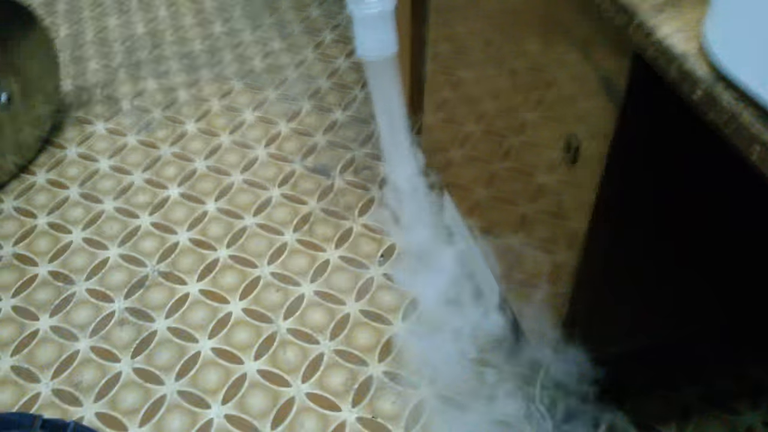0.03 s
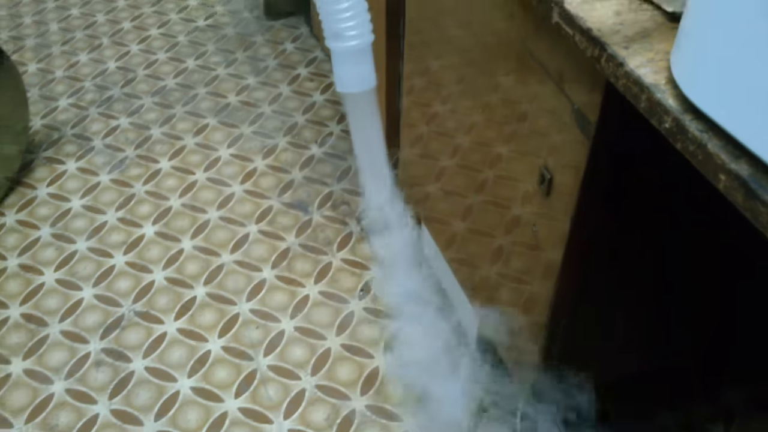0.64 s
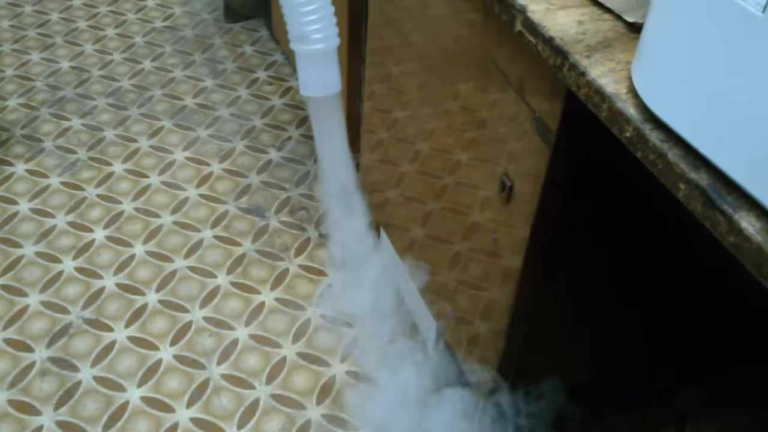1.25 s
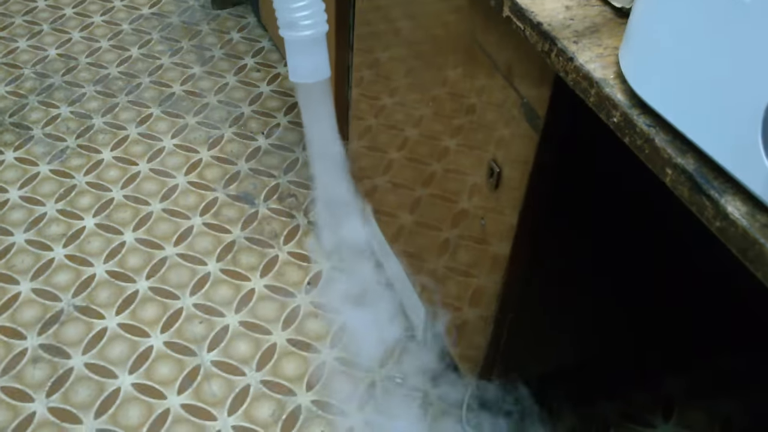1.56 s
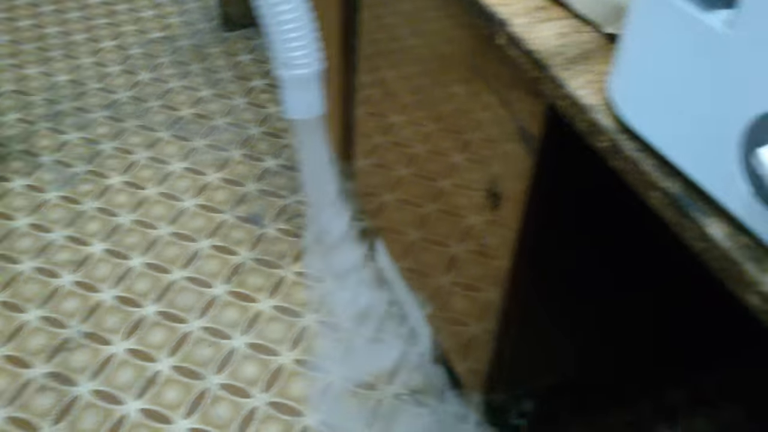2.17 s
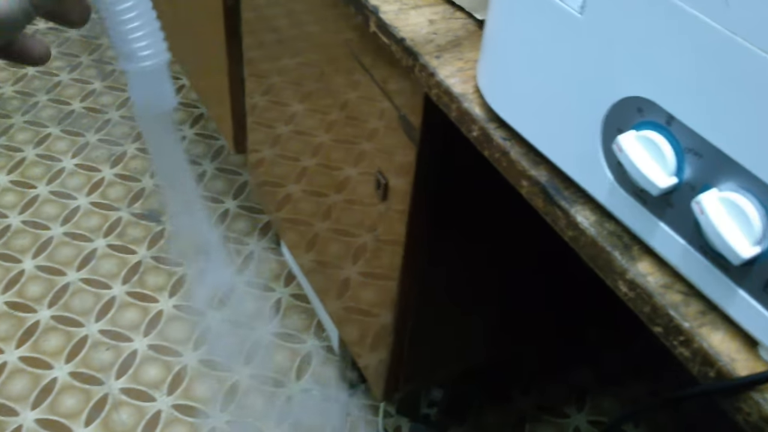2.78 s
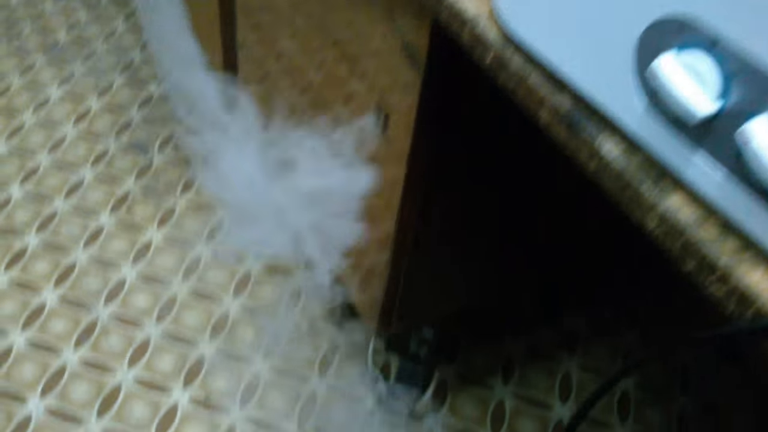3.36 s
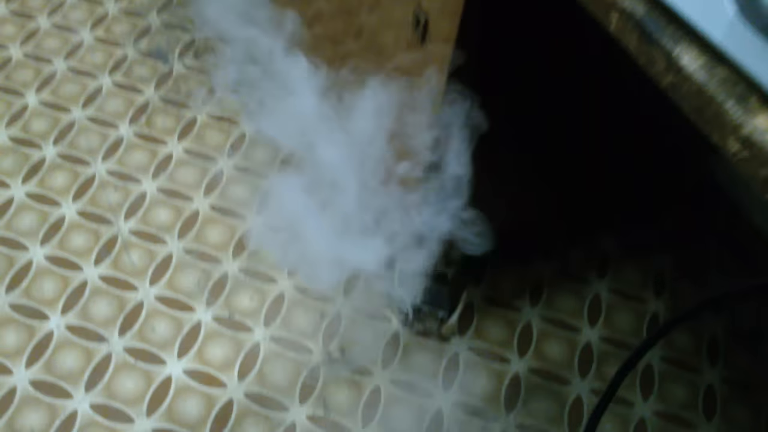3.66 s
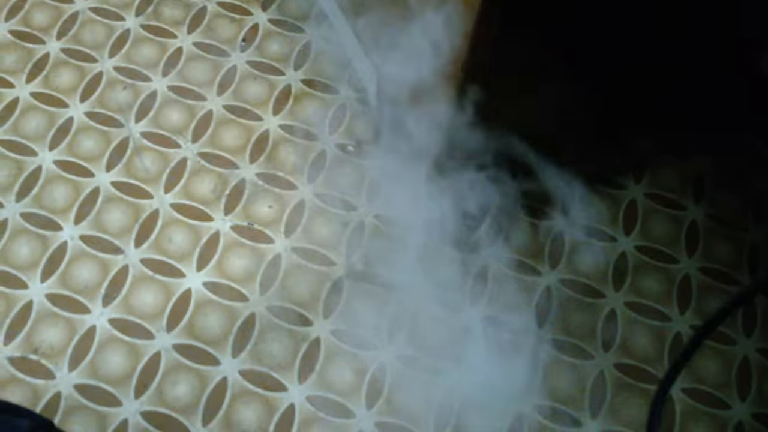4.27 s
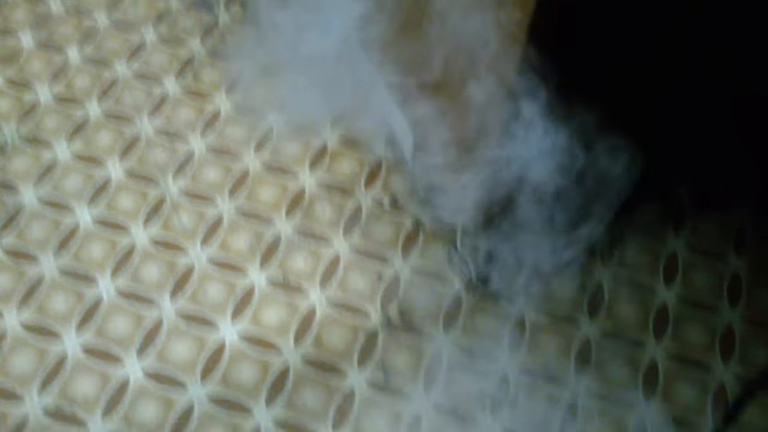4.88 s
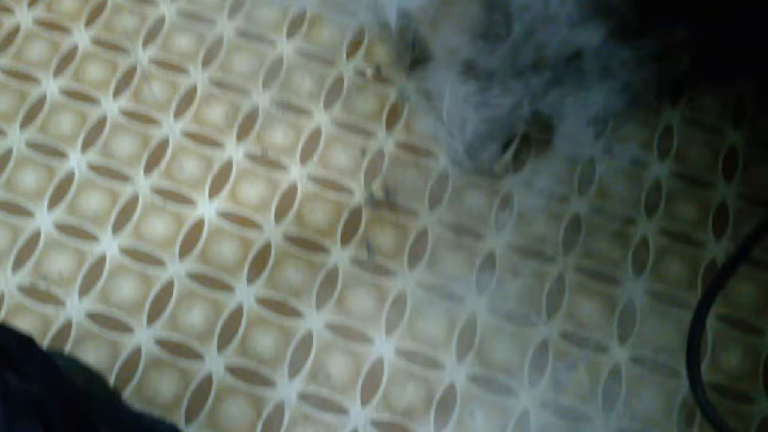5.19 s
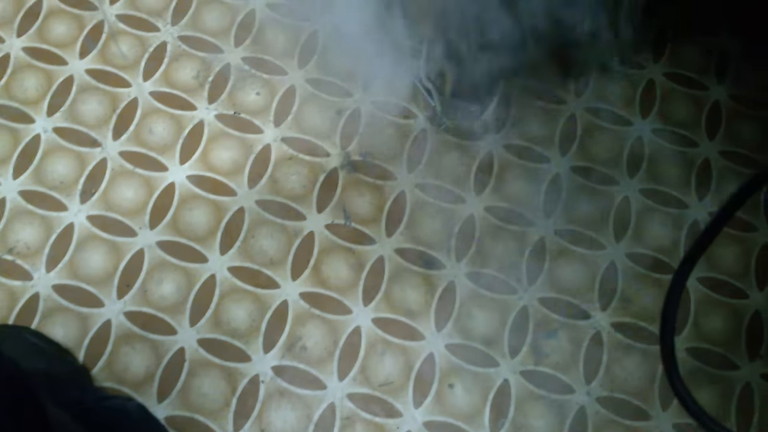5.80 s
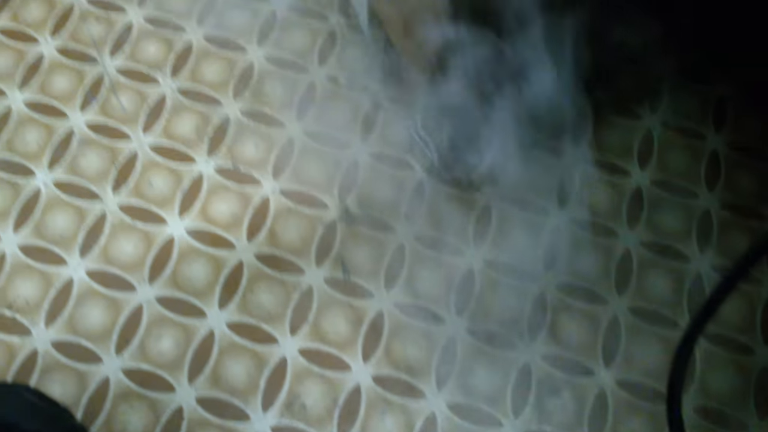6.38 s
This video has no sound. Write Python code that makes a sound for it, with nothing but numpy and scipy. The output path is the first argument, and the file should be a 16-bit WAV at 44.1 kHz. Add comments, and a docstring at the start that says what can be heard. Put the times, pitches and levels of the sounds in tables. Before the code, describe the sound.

In a small room, a hand-held microphone switches on with a pop beside a running mist machine. A low motor hum, a fan whine and a soft rush of air continue throughout, with a thin hiss building at the hose mouth. Underneath are a faint, rapid rattle, scattered high droplet ticks and a few soft handling bumps. Halfway through, the microphone moves lower, gently changing the colour of the whine.

```python
"""A small pop as the microphone switches on, then an ultrasonic inhaler running close by in a small room.
Its blower whines over a deep motor hum and drives mist through a hose; air rushes, and hisses at the mouth.
A loose part rattles faintly, droplets tick in the mist cup, and fingers knock and rustle on plastic.
The hand-held microphone starts beside the case, sinks to the floor, then turns towards the mist."""
import sys
import numpy as np
from scipy import signal
from scipy.fft import rfft, irfft
from scipy.io import wavfile
from scipy.ndimage import uniform_filter1d

SR = 44100
rng = np.random.default_rng(int(sys.argv[2]) if len(sys.argv) > 2 else 0)


def persist_wave(psi):
    """Save psi, clipped to +-1, as 16-bit WAV."""
    counts = np.round(np.clip(psi, -1, 1) * 32767).astype(np.int16)
    wavfile.write(sys.argv[1], SR, np.atleast_2d(counts).T)


N = 292824
TIME = np.arange(N) / SR

# Blower tones. Each row: multiple of the shaft speed, level in dB beside the case, dB near the floor.
# Whole multiples come from blades and poles, the others from bearings.
BLOWER_TONES = [(4, -74, -80.5), (4.57, -81, -86), (5, -86, -85), (8, -79, -73), (10, -74, -73),
                (12, -87, -90), (15, -92, -92), (16, -94, -83), (20, -72.5, -76), (24, -73, -74.5),
                (24.39, -87, -86), (24.96, -84, -86), (26.94, -83, -77), (28, -76.5, -77.5),
                (29.27, -82.5, -85), (31.26, -87, -86), (32, -85, -81), (33.6, -89, -81),
                (36, -77.5, -79.5), (40, -87, -86), (44, -83, -88)]
# Brief swells of single tones. Each row: start, attack, hold and release in seconds, gain in dB,
# multiple of the shaft speed.
BLOWER_SWELLS = [(1.3, .45, .3, .5, 1.5, 20), (2.95, .45, .15, .3, 2, 24), (4.85, .25, .05, .2, 5, 36)]
# Slow motors and mains. Each row: frequency in Hz, level in dB beside the case, dB near the floor.
HUM_TONES = [(49.85, -41.5, -41), (100.9, -65, -79), (135.3, -66.5, -67), (168.6, -78.5, -73),
             (202.4, -58.5, -63.5), (207.2, -70.5, -73.5), (300.4, -76.5, -73.5), (308.7, -78, -77.5),
             (398, -91, -112)]
# Colours of the air: its rush at case and floor, then jet, hiss and sizzle at the hose mouth.
# Each row: frequency in Hz, relative density in dB.
CASE_RUSH_COLOUR = [(20, -9), (65, 1), (140, -7), (165, -13.5), (290, -18.5), (420, -25), (720, -28.5),
                    (1000, -28), (1550, -33), (2000, -29), (2330, -32.5), (2720, -25), (3200, -34.5),
                    (5000, -51)]
FLOOR_RUSH_COLOUR = [(20, -2.5), (65, 2.5), (140, -5), (165, -13.5), (290, -18.5), (540, -27.5), (740, -25),
                     (1150, -26.5), (1650, -32), (2000, -27), (2330, -29.5), (2650, -28.5), (3200, -34.5),
                     (5000, -48.5)]
JET_COLOUR = [(2800, -28), (3500, -0.5), (4000, -1), (4550, 0.5), (4800, -10), (5600, -18.5)]
HISS_COLOUR = [(3800, -10), (4900, 0.5), (5700, 2), (6200, 3.5), (6900, 2), (7150, 7.5), (7600, 5),
               (8100, 0), (9300, -9), (10500, -18)]
SIZZLE_COLOUR = [(7800, -19), (8350, 5.5), (8550, 8.5), (8900, 3.5), (9100, 0), (9800, -15)]
# The microphone's own hiss. Each row: frequency in Hz, relative density in dB.
MIC_COLOUR = [(100, 1), (9000, -2), (11000, -4), (15500, -5)]
# Droplets in the cup. Each row: start in seconds, strike level in dB, ring in Hz.
DROPLET_TICKS = [(.8325, -57, 10700), (.833, -56, 8640), (1.4506, -48, 7300), (1.5464, -58, 8050),
                 (1.6851, -55, 5750), (2.0353, -58.5, 9600), (3.972, -64, 9500), (4.865, -53, 4080),
                 (5.256, -51, 8240), (5.7364, -55, 4400), (5.7748, -66, 11400), (6.21, -62, 10700),
                 (6.4897, -54, 9540), (6.6169, -41.5, 8900)]
# Soft knocks and scuffs. Each row: start in seconds, strike level in dB, ring in Hz, t60 in seconds.
HAND_KNOCKS = [(.4723, -50.5, 1500, .008), (.5407, -48.5, 950, .014), (.7597, -49, 700, .09),
               (1.257, -54, 2500, .03), (2.954, -56, 1250, .04), (3.9664, -58, 4400, .05),
               (6.0, -55.5, 570, .1), (6.1065, -52.5, 680, .04)]
# Fingers on plastic. Each row: start, attack, hold and release in seconds, level in dB, centre in Hz.
FINGER_RUSTLES = [(.3, .03, 0.2, 0.066, -68.5, 1300), (3.96, 0.01, .015, .03, -67, 4460),
                  (5.768, .006, .008, 0.018, -68.5, 5000)]

# Base levels in dB from three positions: beside the case, near the floor, turned towards the mist.
JET_DB, HISS_DB, SIZZLE_DB = (-77, -82.5, -78.5), (-74, -76.5, -73), (-82, -81.5, -75)
RATTLE_BODY_DB, RATTLE_EDGE_DB = (-82, -77, -73.5), (-79, -76.5, -77.5)

SHAFT_HZ, MIC_ON_S = 103.92, .329
ROCK_HZ, ROCK_SWING_HZ, ROCK_PERIOD_S, ROCK_FASTEST_S = 15.08, .95, 2.1, 5.426


def blower(turns, lowered, turned, shade_db=-5, shade_hz=2300):
    """Blade, pole and bearing tones; each wavers as the microphone crosses the room's standing waves."""
    out = 0
    for order, case_db, floor_db in BLOWER_TONES:
        # the table edge shades the high tones once the microphone has turned
        shaded = turned / (1 + (shade_hz / (order * SHAFT_HZ)) ** 8)
        waver_db = .9 * walk(3) + .4 * walk(30)
        swell_db = sum(gain * swell(*shape) for *shape, gain, tone in BLOWER_SWELLS if tone == order)
        db = case_db + lowered * (floor_db - case_db) + shaded * shade_db + waver_db + swell_db
        out = out + undb(db) * np.sqrt(2) * np.sin(2 * np.pi * (order * turns + rng.random()))
    return out


def motor_hum(lowered, turned):
    """Motors and mains: a firm deep hum under weaker tones that drift more in level and phase."""
    floor_mix = .76 * lowered + .64 * turned  # the turn carries the hum past its floor balance
    out = 0
    for k, (hz, case_db, floor_db) in enumerate(HUM_TONES):
        waver_db, drift_rad = (.96, .24) if k else (.73, .04)
        db = case_db + floor_mix * (floor_db - case_db) + waver_db * walk(5.03)
        phase = 2 * np.pi * (hz * TIME + rng.random()) + drift_rad * walk(3.92)
        out = out + undb(db) * np.sqrt(2) * np.sin(phase)
    return out


def airflow(turns, lowered, turned, build_s=.92):
    """Turbulence rushes in case and hose; a jet, a fine hiss and a sizzle leave the mouth."""
    tilt = swell(1.944, .15, .49, .14)  # the hose is tilted
    billow = swell(3.35, .47, .14, .42)  # mist billows past the microphone
    faint = np.exp(-np.maximum(TIME - MIC_ON_S, 0) / build_s)  # the hiss starts faint and builds
    jet_db = heard_db(JET_DB, lowered, turned) + 8.6 * tilt
    hiss_db = heard_db(HISS_DB, lowered, turned) + 1.5 * tilt - 10.5 * faint
    sizzle_db = heard_db(SIZZLE_DB, lowered, turned) + 5.8 * billow
    case_rush = noise(CASE_RUSH_COLOUR, ripple_db=1, ripple_hz=14) * undb(-55) * np.sqrt(1 - lowered)
    floor_rush = noise(FLOOR_RUSH_COLOUR, ripple_db=2.1, ripple_hz=14) * undb(-54) * np.sqrt(lowered)
    jet = noise(JET_COLOUR) * undb(jet_db + .29 * walk(30))
    hiss = noise(HISS_COLOUR, ripple_db=3, ripple_hz=18) * undb(hiss_db)
    sizzle = noise(SIZZLE_COLOUR, ripple_db=1, ripple_hz=17) * undb(sizzle_db)
    chop = 1 + .11 * np.cos(2 * np.pi * 2 * turns)  # the rotor chops the treble twice a turn
    rush = (case_rush + floor_rush) * undb(.5 * walk(25.03))
    mouth = (jet + chop * (hiss + sizzle)) * undb(.68 * walk(40))
    return rush + mouth


def rattle(lowered, turned, chatter_s=.0079, rebound=.63, uneven_db=1.3):
    """A loose part rocks at a slowly swinging rate: a bright chattering tap, then a duller one back."""
    since = TIME - ROCK_FASTEST_S
    swing = ROCK_SWING_HZ * ROCK_PERIOD_S / (2 * np.pi) * np.sin(2 * np.pi * since / ROCK_PERIOD_S)
    cycles = ROCK_HZ * since + swing
    ages_s = [(cycles + shift) % 1 / ROCK_HZ for shift in (0, .5)]
    tap, back = (np.exp(-age / chatter_s) * rng.standard_normal(N) for age in ages_s)
    bright = resonate(resonate(tap, 2010, 300), 2010, 900)
    dull = resonate(resonate(tap + back, 730, 280), 1550, 800)
    contact = resonate(resonate(tap, 2700, 900), 3500, 3900)
    body = (unit(bright) + rebound * unit(dull)) * undb(heard_db(RATTLE_BODY_DB, lowered, turned))
    edge = unit(contact) * undb(heard_db(RATTLE_EDGE_DB, lowered, turned))
    passing_db = 4 * np.sin(np.pi * lowered)  # louder as the microphone passes the front of the case
    return (body + edge) * undb(passing_db + uneven_db * walk(15))


def droplets(t60_s=.017):
    """Droplets land in the mist cup with short, high ticks."""
    return taps([(*row, t60_s) for row in DROPLET_TICKS], tail_db=-30, sharpness=4)


def knocks():
    """The hand bumps and scuffs softly, duller than the droplets."""
    return taps(HAND_KNOCKS, tail_db=-20, sharpness=2.5)


def rustle(grains_per_s=240, spread_db=4, grain_s=.0023):
    """Fingers shift on the plastic: scatters of tiny dry clicks."""
    onsets = rng.random(N) < grains_per_s / SR
    grains = onsets * undb(spread_db * np.clip(rng.standard_normal(N), -2, 2))
    scratch = signal.lfilter([1], [1, -np.exp(-1 / (grain_s * SR))], grains) * rng.standard_normal(N)
    out = 0
    for *shape, db, hz in FINGER_RUSTLES:
        crackle = resonate(resonate(scratch, hz, .94 * hz), .88 * hz, 8100)
        out = out + unit(crackle) * undb(db) * swell(*shape)
    return out


def taps(rows, tail_db, sharpness, grit=.45, tail_t60_s=.15):
    """Each tap rings briefly at its own pitch, with a gritty edge and a faint room tail."""
    out, t = np.zeros(2 * N), np.arange(SR // 4) / SR
    for start_s, db, hz, t60_s in rows:
        scatter = unit(resonate(rng.standard_normal(len(t)), hz, hz / sharpness))
        tone = (np.sin(2 * np.pi * hz * t) + grit * scatter) / (1 + grit)
        ring = tone * undb(-60 * t / t60_s)
        tail = scatter * undb(tail_db - 60 * t / tail_t60_s)
        start = int(start_s * SR)
        out[start:start + len(t)] += undb(db) * resonate(ring + tail, hz, 2 * hz / sharpness)
    return out[:N]


def noise(points, ripple_db=0, ripple_hz=20):
    """Coloured noise, rms 1; the ripple stands for many narrow resonances of case and room."""
    f = np.arange(N // 2 + 1) * SR / N
    hz, db = np.transpose(points)
    colour_db = np.interp(np.log(f + 1), np.log(hz), db)
    beyond = np.maximum(f / hz[-1], hz[0] / (f + 1))
    colour_db -= 40 * np.log10(np.maximum(beyond, 1))  # 12 dB an octave past either end
    ripple = np.interp(f / ripple_hz, np.arange(len(f)), rng.standard_normal(len(f)))
    return unit(irfft(rfft(rng.standard_normal(N)) * undb(colour_db + ripple_db * ripple), N))


def resonate(x, hz, width_hz):
    """One resonance, gain 1 at the centre."""
    return signal.lfilter(*signal.iirpeak(min(hz, .45 * SR), hz / width_hz, fs=SR), x)


def walk(rate_hz):
    """Random steps smoothed twice, rms 1."""
    hold = max(int(SR / rate_hz), 1)
    steps = np.repeat(rng.standard_normal(N // hold + 1), hold)
    return unit(uniform_filter1d(uniform_filter1d(steps, hold), hold)[:N])


def glide(start_s, length_s):
    """A smooth move from 0 to 1."""
    return np.sin(np.pi / 2 * np.clip((TIME - start_s) / length_s, 0, 1)) ** 2


def swell(start_s, attack_s, hold_s, release_s):
    """A smooth rise from 0 to 1 and back."""
    return glide(start_s, attack_s) - glide(start_s + attack_s + hold_s, release_s)


def heard_db(levels, lowered, turned):
    """A sound's level as the microphone sinks and then turns."""
    case_db, floor_db, mist_db = levels
    return case_db + lowered * (floor_db - case_db) + turned * (mist_db - floor_db)


def undb(db):
    """Decibels to gain."""
    return 10 ** (np.asarray(db) / 20)


def unit(x):
    """Scale to rms 1."""
    return x / np.sqrt(np.mean(x ** 2))


def scene():
    """The inhaler in mono, from a microphone that sinks from case to floor and turns to the mist."""
    lowered, turned = glide(start_s=3.32, length_s=1.18), glide(start_s=4.82, length_s=.71)
    shaft_hz = SHAFT_HZ * (1 + .0004 * walk(1.5) + .0001 * walk(12))
    turns = np.cumsum(shaft_hz) / SR
    impacts = droplets() + knocks()
    tones = blower(turns, lowered, turned) + motor_hum(lowered, turned)
    return (tones + airflow(turns, lowered, turned) + rattle(lowered, turned) + impacts + rustle())[None]


def record(dry, hiss_db=-78, pop_db=-27.5, settle_s=.18, offset_db=-45.5, top_hz=15500):
    """The microphone switches on with a pop as its bias settles, adds its own hiss and cuts the top."""
    since = np.maximum(TIME - MIC_ON_S, 0)
    bias = undb(offset_db) + undb(pop_db) * np.exp(-since / settle_s)
    live = (dry + noise(MIC_COLOUR) * undb(hiss_db) + bias) * (since > 0)
    return signal.sosfilt(signal.ellip(10, .2, 80, top_hz, fs=SR, output="sos"), live)


dry = scene()
out = record(dry)
persist_wave(out)
```